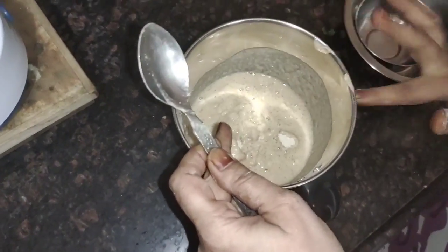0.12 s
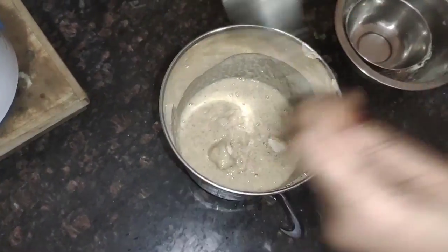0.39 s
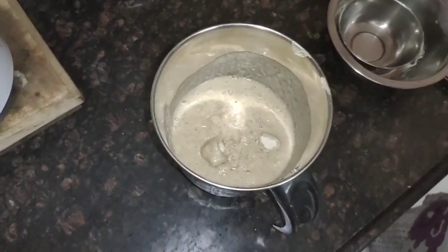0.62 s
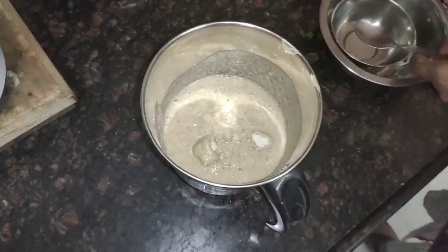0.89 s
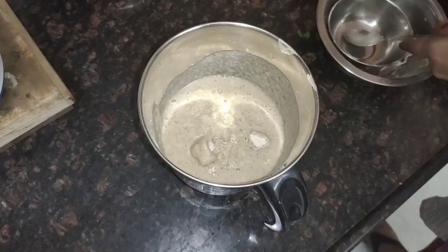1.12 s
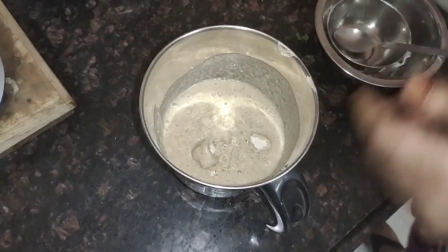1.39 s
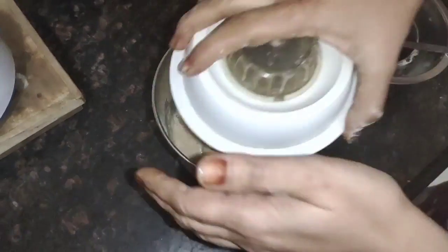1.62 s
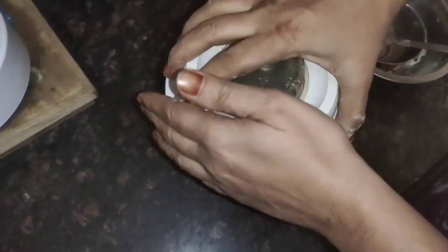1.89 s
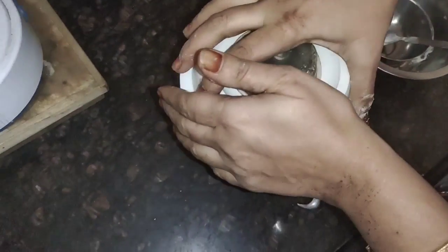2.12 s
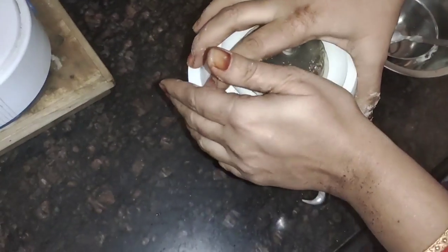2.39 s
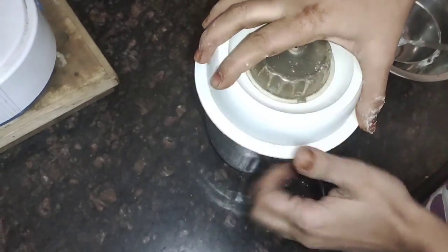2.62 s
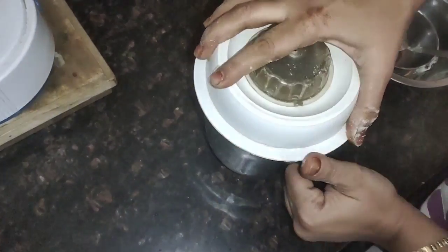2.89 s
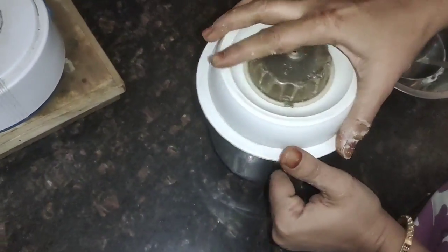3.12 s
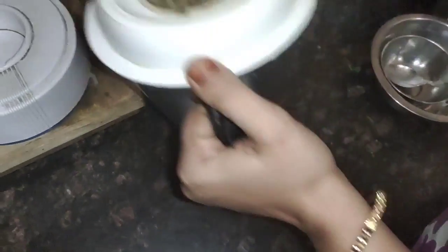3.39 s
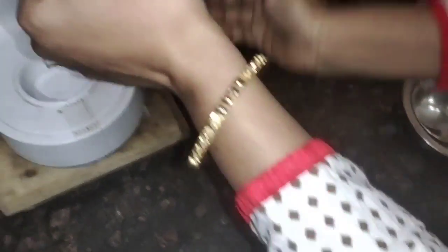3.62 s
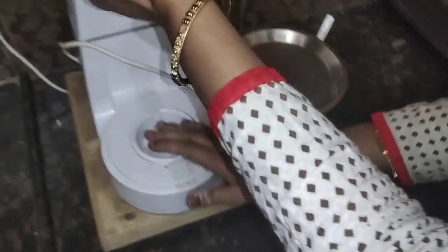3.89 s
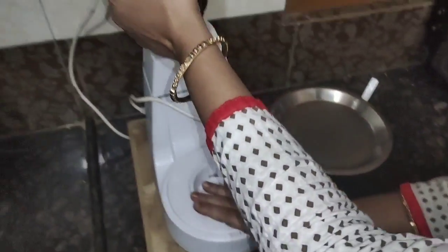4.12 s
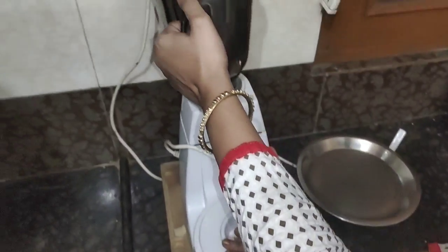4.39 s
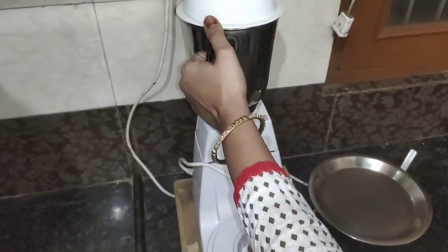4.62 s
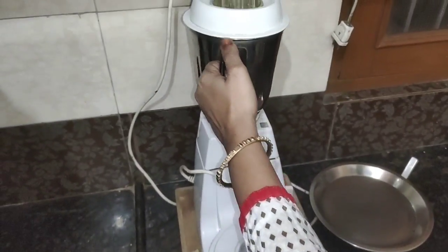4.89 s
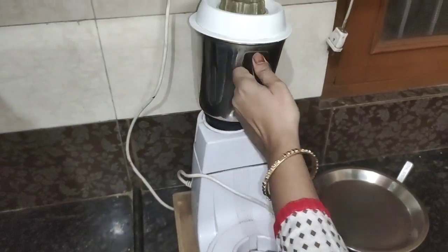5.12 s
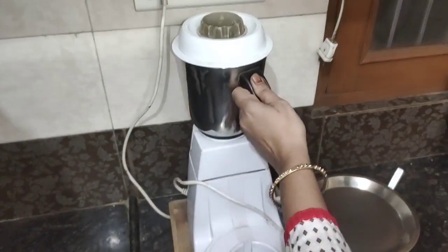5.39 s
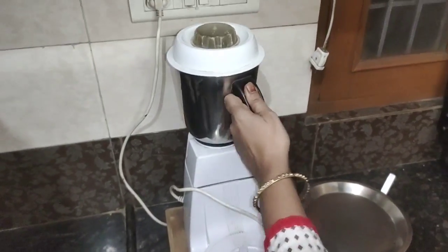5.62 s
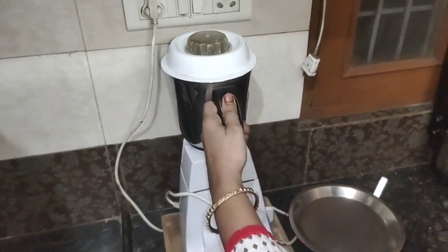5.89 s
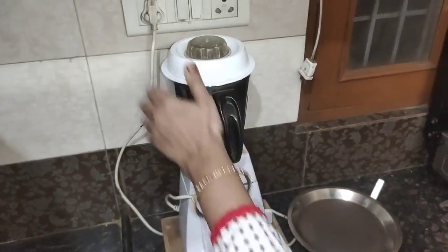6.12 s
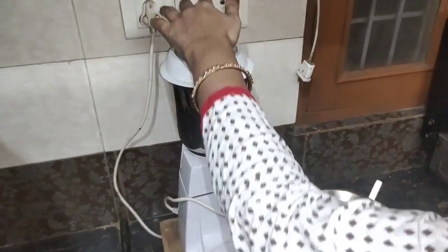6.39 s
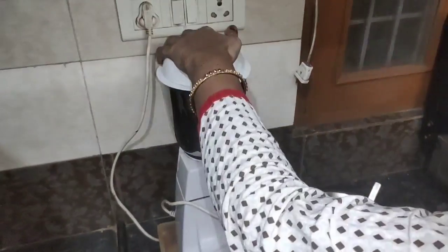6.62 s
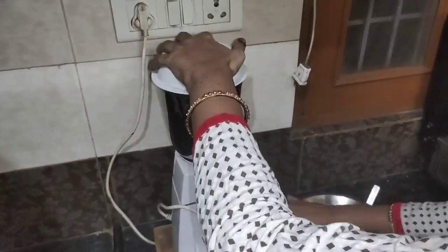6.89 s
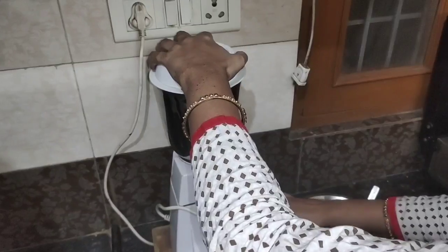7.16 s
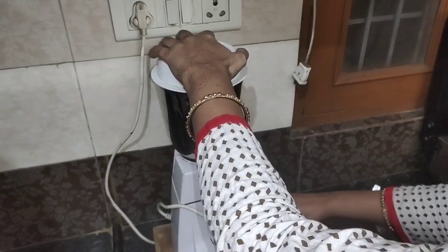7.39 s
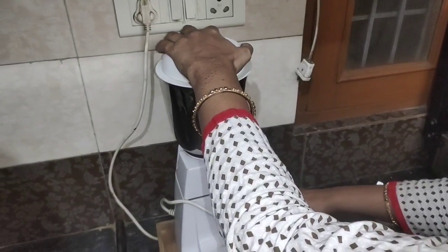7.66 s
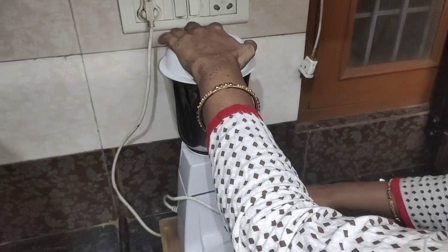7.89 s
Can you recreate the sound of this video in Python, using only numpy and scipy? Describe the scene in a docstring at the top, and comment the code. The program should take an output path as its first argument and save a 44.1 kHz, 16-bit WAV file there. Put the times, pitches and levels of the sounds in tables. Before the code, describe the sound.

Bright metal rattle, dull plastic knocks, soft handling rustle and a low mains hum as a blender jar is closed and seated, with the motor still silent.

```python
"""A steel spoon is dropped into a steel bowl and rattles, in a small tiled kitchen: both ring as sums of decaying modes.
A plastic lid is pressed on a jar, the jar is carried to a mixer base and locked, and switches click: rough
contacts excite damped modes and broadband noise. Dense noise tails echo these struck sounds.
Hands, sleeves and sliding are coloured noise, handling bumps are low noise, and mains hum is a harmonic
series. A far steady tone, a faint low drone and microphone hiss lie beneath."""
import sys
import numpy as np
from scipy import signal
from scipy.fft import rfft, irfft
from scipy.io import wavfile
from scipy.ndimage import uniform_filter1d

SR = 44100
rng = np.random.default_rng(int(sys.argv[2]) if len(sys.argv) > 2 else 0)


def gain_from_db(level_db):
    """Convert decibel levels to linear amplitude factors (20 dB per decade)."""
    decades = np.asarray(level_db, float) / 20
    return 10 ** decades


def int16_out(signal):
    """Quantize to a 16-bit WAV file."""
    q = np.round(np.clip(np.atleast_2d(signal).T, -1, 1) * 32767)
    wavfile.write(sys.argv[1], SR, q.astype(np.int16))


N = 353682  # samples


def evened(x):
    """Normalisation: scales a signal to unit rms."""
    return x / np.sqrt(np.mean(x ** 2) + 1e-20)


def read(points, hz):
    """Interpolation along logarithmic frequency."""
    f, value = np.transpose(points)
    return np.interp(np.log(hz + 1), np.log(f + 1), value)


def along(rows):
    """Linear interpolation in time: every column of a curve, sample by sample."""
    s, *columns = np.transpose(rows)
    return [np.interp(np.arange(N) / SR, s, column) for column in columns]


def add(mix, s, sound):
    """Superposition: adds a sound to the mix at time s, in place."""
    part = mix[round(s * SR):][:len(sound)]
    part += sound[:len(part)]


def coloured(points, size, grain_db=0):
    """Spectral shaping of white noise, whose level may flicker every few milliseconds; unit rms."""
    flicker = gain_from_db(grain_db * evened(uniform_filter1d(rng.standard_normal(size), size=300)))
    white = rng.standard_normal(size) * flicker
    shape = gain_from_db(read(points, np.fft.rfftfreq(size, 1 / SR)))
    return evened(irfft(rfft(white) * shape, size))


def swells(start, length, rise_db_per_s, fall_db_per_s, swell_db=0):
    """Exponential rise, hold and fall of each event, in dB under its peak, one value per millisecond."""
    t = np.arange(0, N / SR + .01, .001) - start[:, None]
    length = np.maximum(length, .002)[:, None]
    held = swell_db * (np.clip(t / length, 0, 1) - 1)
    return held + rise_db_per_s * np.minimum(t, 0) - fall_db_per_s * np.maximum(t - length, 0)


def summed(event_db):
    """Energy addition: powers of overlapping events add; returns the gain sample by sample."""
    gain = np.sqrt((gain_from_db(np.maximum(event_db, -200)) ** 2).sum(0))
    return np.interp(np.arange(N) / SR, np.arange(len(gain)) / 1000, gain)


def ring(modes, length_s, rise_s, rough, scatter_db, weight_db=0):
    """Modal superposition: each blow favours other modes, and loose contact makes them flutter."""
    hz, db, t60 = np.transpose(modes)[:, :, None]
    t = np.arange(round(length_s * SR)) / SR
    chance = rng.standard_normal((2, len(hz), 1))
    # a new flutter value every 9 ms, joined by straight lines
    steps = rng.standard_normal((2, len(hz), len(t) // 400 + 2))
    at, part = np.divmod(np.arange(len(t)), 400)
    part = part / 400
    in_phase, quadrature = steps[:, :, at] * (1 - part) + steps[:, :, at + 1] * part
    turn = 2 * np.pi * hz * t + .5 * chance[1]
    tones = (1 + rough * in_phase) * np.sin(turn) + rough * quadrature * np.cos(turn)
    level = gain_from_db(db + weight_db + scatter_db * chance[0] - 60 * t / np.maximum(t60, .02))
    start = 1 - np.exp(-t / rise_s)
    return start * (level * tones).sum(0) / np.linalg.norm(gain_from_db(db + weight_db))


# mains fundamental, picked up while a hand is near metal or the cable: t/s, rms level/dB
MAINS = [(0.4, -88), (0.54, -44.5), (0.67, -51), (0.742, -40.5), (1.442, -39.5), (1.664, -46),
         (1.776, -76.5), (3.52, -71), (3.9, -40.5), (4.38, -33), (4.76, -38), (4.84, -37.5), (4.93, -49),
         (5.02, -34.5), (5.38, -33.5), (5.65, -22.5), (5.71, -26), (5.85, -42), (6.235, -41), (6.25, -49.5),
         (6.41, -54), (6.77, -48), (8.02, -44)]
# odd overtones of the mains: t/s, rms level of the 3rd/dB, 5th/dB, 7th/dB
OVERTONES = [(0, -85, -94, -88), (3.5, -90.5, -88.5, -91.5), (3.8, -57, -75.5, -85), (4.6, -53, -77, -67),
             (5.0, -62.5, -66, -67), (5.7, -68, -58, -69), (6.2, -105, -71.5, -72), (6.4, -87, -77, -78.5),
             (8.02, -82, -73, -71)]
# 11th and 13th overtones: level relative to the 7th/dB
UPPER_DB = [-9, -12.5]


def hum():
    """Harmonic series: a mains tone with odd overtones, plus the tone of a steady appliance in the house."""
    mains_hz, far_hz, far_db = 49.9, 200.6, -76.5
    turn = 2 * np.pi * np.arange(N) / SR
    levels = along(MAINS) + along(OVERTONES)
    mains = sum(gain_from_db(db) * np.sin((2 * k + 1) * mains_hz * turn) for k, db in enumerate(levels))
    upper = sum(gain_from_db(levels[-1] + db) * np.sin(k * mains_hz * turn) for k, db in zip((11, 13), UPPER_DB))
    far = gain_from_db(far_db) * np.sin(far_hz * turn)
    return np.sqrt(2) * (mains + upper + far)  # sine peak from rms


# steady handling rumble: t/s, level/dB
STEADY_RUMBLE = [(0.0, -67), (0.42, -71), (0.53, -53.5), (1.7, -52.5), (1.77, -78), (2.6, -77),
                 (2.9, -69.5), (3.48, -77), (3.82, -54.5), (4.6, -56), (4.9, -61.5), (5.9, -62), (6.9, -71),
                 (8.02, -70)]
# jolts of the hand that holds the microphone: t/s, length/s, peak level/dB
JOLTS = [(.2, 0.063, -57.5), (1.29, 0.011, -43.5), (1.47, 0.015, -40.5), (.52, 0.05, -61),
         (1.85, 0.025, -59), (2.01, 0.047, -39), (2.37, 0.036, -54), (2.685, 0.023, -58.5),
         (2.79, .01, -45), (2.89, 0.0091, -50), (2.979, 0.009, -54.5), (4.2, .01, -41), (4.4, 0.018, -30),
         (4.5, 0.16, -46), (4.71, 0.024, -41), (5.45, 0.031, -34), (5.67, 0.022, -41), (7.01, .05, -66.5)]


def rumble():
    """Low-frequency handling noise: one lumpy noise under the combined power of steady level and jolts."""
    spectrum = [(15, -28.5), (25, -2), (50, 2.5), (100, -0.5), (150, -5), (220, -25.5), (400, -72.0)]  # f/Hz, dB
    lumps = coloured(spectrum, N, grain_db=-1.5)
    start, length, db = np.transpose(JOLTS)
    jolts = summed(db[:, None] + swells(start, length, rise_db_per_s=401, fall_db_per_s=218.5))
    return np.hypot(gain_from_db(along(STEADY_RUMBLE)[0]), jolts) * lumps


# gestures of hands and sleeves: t/s, length/s, peak level/dB of fabric hiss, of rubbing, of sliding on stone
GESTURES = [(0.111, 0.18, -63.5, -63.5, -69.5), (.5, 0.034, -58.5, -58, -53),
            (.865, 0.024, -61, -58.5, -48), (0.974, 0.22, -57.5, -55.5, -46.5),
            (1.88, 0.37, -65, -68.5, -59), (2.334, 0.06, -52, -55.5, -43.5), (2.665, 0.05, -55, -59, -67.5),
            (2.884, 0.021, -60.5, -61, -63.5), (3.071, 0.047, -58, -59.5, -51.5),
            (3.241, 0.032, -63.5, -67, -64), (5.5, 0.13, -66.5, -53.5, -44),
            (5.871, 0.016, -55, -54.5, -52.5), (6.378, 0.24, -67.5, -76, -82),
            (6.971, 0.014, -63, -61.5, -78.5), (7.131, 0.017, -67, -69, -65),
            (7.509, 0.027, -63.5, -86, -67)]
# faint rustle between the gestures: t/s, level/dB of hiss, of rubbing, of sliding
STEADY_RUSTLE = [(0, -94, -86.5, -77.5), (3.55, -96.5, -90.5, -83), (3.91, -83, -78.5, -72.5),
                 (4.4, -76, -78, -71), (5.0, -77.5, -76.5, -64.5), (5.4, -80.5, -77, -69),
                 (6.2, -78, -81.5, -77.5), (8.02, -85, -82.5, -77)]
# spectrum of fabric hiss: f/Hz, relative level/dB
HISS_SPECTRUM = [(2470, -40), (4200, -15.5), (4830, -10), (5250, -2.5), (5780, 0.5), (7230, -9.5),
                 (8500, -14.5), (14900, -25), (16000, -35)]
# spectrum of rubbing skin: f/Hz, relative level/dB
RUB_SPECTRUM = [(760, -29.5), (1300, -19.5), (1570, -3.5), (2350, -0.5), (3030, -3.5), (4800, -12.5),
                (6240, -39.5), (10600, -120)]
# spectrum of the sliding jar: f/Hz, relative level/dB
SLIDE_SPECTRUM = [(100, -51), (170, -19.5), (419, -8), (476, -8), (1250, -17), (1500, -26), (1950, -57.5),
                  (3300, -120)]
# decay rate after a gesture, for hiss, rubbing and sliding in turn: rate/(dB/s)
FADE_DB_PER_S = [129, 133.5, 164.5]


def moves():
    """Friction noise: cloth hisses, skin rubs and the jar slides, each a band of noise with its own envelope."""
    hiss = coloured(HISS_SPECTRUM, N, grain_db=1.5)
    rub = coloured(RUB_SPECTRUM, N, grain_db=1.0)
    slide = coloured(SLIDE_SPECTRUM, N, grain_db=2.0)
    start, length, *peaks = np.transpose(GESTURES)
    out = np.zeros(N)
    for noise, peak_db, fade, steady_db in zip((hiss, rub, slide), peaks, FADE_DB_PER_S, along(STEADY_RUSTLE)):
        # a gesture sets in fast, then grows a little while it lasts
        envelope_db = swells(start, length, rise_db_per_s=594, fall_db_per_s=fade, swell_db=5.5)
        gain = summed(peak_db[:, None] + envelope_db)
        out += np.hypot(gain, gain_from_db(steady_db)) * noise
    return out


# modes of jar, lid and plastic base together: f/Hz, relative level/dB, t60/s
JAR_MODES = [(250, -4, .09), (292, 0, .1), (332, -4, .09), (395, -9, .08), (556, -4, .12), (625, -3, .12),
             (663, 0, .11), (775, -8, .1), (955, -5, .16), (1050, -18, .7), (1155, -6, .15),
             (1270, -8, .12), (1480, -10, .1), (2050, -8, .06), (2500, -10, .05), (2770, -9, .03)]
# knocks and clicks on them: t/s, strength/dB, favoured f/Hz, spread/octaves (at least 0.25 is used),
# contact decay time/ms, treble level relative to strength/dB
KNOCK_EVENTS = [(0.512, -33.5, 790, 0.76, 53, -24), (1.817, -13.5, 745, 0.58, 19.5, -15),
                (1.846, -9.5, 687, 0.71, 25, -24), (1.994, -21.5, 300, 0.88, 12, -21.5),
                (2.333, -23.5, 871, 0.88, 36, -37), (2.69, -47.5, 2343, 0.17, 39, -17),
                (3.072, -43.5, 700, 1.07, 72, -20), (3.269, -44, 374, 0.39, 7.2, -8.5),
                (4.381, -15, 621, 0.77, 8.4, -14), (4.532, -19, 671.5, 1.05, 5.8, -21.5),
                (4.701, -25.5, 330, 0.77, 11.7, -23.5), (4.807, -13, 294, 0.7, 7.2, -18),
                (4.86, -30, 302, 0.83, 7.97, -21), (5.415, -26.5, 596, 0.82, 24, -11),
                (5.427, -6.5, 420, 0.85, 13, -10), (5.488, -16, 893, 0.5, 14, -11.5),
                (5.911, -37.5, 650, 0.91, 9.4, -9.5), (6.006, -40.5, 397.3, 0.22, 2.6, -30),
                (7.136, -49.5, 268.8, 0.23, 6.7, -12), (7.206, -42.5, 473, 0.76, 5.8, -2),
                (7.518, -42, 2776, 0.41, 10, -12.5), (7.525, -53, 730, 0.26, 7, -30)]


def knocks():
    """Impact excitation: a short rough contact drives the modes near a favoured pitch, under a treble scuff."""
    out, t = np.zeros(N), np.arange(SR // 4) / SR
    scuff_spectrum = [(400, -2.5), (1200, 4), (3000, -6.0), (4500, -15.5), (6000, -14), (9000, -21.5),
                      (16000, -34)]  # f/Hz, relative level/dB
    for s, db, hz, octaves, contact_ms, treble_db in KNOCK_EVENTS:
        octaves = max(octaves, .25)
        decay = np.exp(-1000 * t / max(contact_ms, .5))
        touch = (1 - np.exp(-t / .0005)) ** 2 * decay

        def near_db(f):
            """Gaussian weighting over log frequency: 6 dB down at one spread from the favoured pitch."""
            return -6 * (np.log2(f / hz) / octaves) ** 2

        mode_weights = near_db(np.array(JAR_MODES)[:, :1])
        body = ring(JAR_MODES, .35, .003, rough=.65, scatter_db=2., weight_db=mode_weights)
        thud_spectrum = [(f, near_db(f)) for f in np.geomspace(60, 16000, num=16)]
        thud = coloured(thud_spectrum, len(t)) * touch
        scuff = coloured(scuff_spectrum, len(t)) * (touch + 0.1 * touch ** 0.14)  # a faint slow tail
        add(out, s, gain_from_db(db + 6.5 - 10.63 * octaves) * body)  # a flat blow deadens the ring
        add(out, s, gain_from_db(db - 7) * thud + gain_from_db(db + treble_db) * scuff)
    # plastic is soft: little top
    return signal.sosfilt(signal.butter(2, 7000., fs=SR, output="sos"), out)


# modes of the steel spoon: f/Hz, relative level/dB, t60/s
SPOON_MODES = [(1658, 0, .4), (1590, -8, .4), (2525, -10, .35), (2680, -8, .5), (2848, -5, .3),
               (4630, -10, .25), (4904, -12, .3), (5114, -7, .15), (5512, -12, .25), (5792, -11, .25),
               (6691, -16, .4), (7838, -17, .3), (9039, -19, .2), (9814, -17, .2), (10930, -25, .2)]
# modes of the steel bowl: f/Hz, relative level/dB, t60/s
BOWL_MODES = [(641, -7, .45), (510, -14, .35), (860, -10, .4), (950, -8, .4), (1020, -11, .4),
              (1589, -6, .5), (1615, -5, .5), (1683, 0, .6), (1810, -11, .45), (1960, -13, .45),
              (2680, 2, .6), (2778, -8, .6), (3133, -18, .5), (3290, -27, 1.6), (4290, -14, .55),
              (4897, -12, .45), (5815, -10, .5), (7375, -16, .5), (7445, -13, .5), (7854, -15, .55),
              (9685, -19, .4), (9808, -18, .4), (11130, -22, .5), (11780, -25, .45)]
# touches of steel on steel: t/s, spoon ring level/dB, bowl ring level/dB, crack level/dB
TOUCHES = [(1.261, -20, -36, -13.5), (1.292, -23, -33, -18.5), (1.426, -28.5, -33.5, -30),
           (1.434, -29.5, -15, -16), (1.448, -27.5, -14, -14.5), (1.476, -32, -23, -21.5),
           (1.515, -29.5, -18.5, -18), (1.545, -34, -23.5, -23.5), (1.574, -37.5, -28, -23),
           (1.674, -45.5, -36, -26.5)]
# crack spectrum of the spoon: f/Hz, relative level/dB
SPOON_CRACK = [(530, -74.5), (900, -42), (1660, -9.5), (2330, -14.5), (2890, -9.5), (3590, -28),
               (5220, -6.5), (13800, -35), (15700, -66.5)]
# crack spectrum of the bowl: f/Hz, relative level/dB
BOWL_CRACK = [(210, -46.5), (350, -16.5), (1360, -12.5), (1630, -4), (2240, -15), (2750, -12.5),
              (4040, -13.5), (7670, -11.5), (12800, -22), (15000, -30.5), (15700, -59.5)]


def clinks():
    """Modal radiation: spoon and bowl ring at each touch, over a noise crack for their dense high modes."""
    out, t = np.zeros(N), np.arange(SR // 2) / SR
    # random peaks over frequency make the dense modes stand out of the shimmer
    peaks = gain_from_db(6 * evened(uniform_filter1d(rng.standard_normal(len(t) // 2 + 1), size=12)))
    for s, spoon_db, bowl_db, crack_db in TOUCHES:
        add(out, s, gain_from_db(spoon_db) * ring(SPOON_MODES, .4, .0006, rough=.7, scatter_db=2.))
        add(out, s, gain_from_db(bowl_db) * ring(BOWL_MODES, .7, .0006, rough=.45, scatter_db=2.))
        spoon_share = 1 / (1 + gain_from_db(2 * (bowl_db - spoon_db)))  # of the ringing power
        dense = spoon_share * coloured(SPOON_CRACK, len(t)) + (1 - spoon_share) * coloured(BOWL_CRACK, len(t))
        peaky = evened(irfft(rfft(dense) * peaks, len(t)))
        contact = gain_from_db(-60 * t / 0.026) * dense
        shimmer_t60 = 0.52 - 0.18 * spoon_share  # s; the spoon dies sooner
        shimmer = gain_from_db(-7.5 - 60 * t / shimmer_t60) * peaky
        onset = 1 - np.exp(-t / .0008)
        add(out, s, gain_from_db(crack_db) * onset * (contact + shimmer))
    return out


# reverberation of the kitchen: f/Hz, t60/s
KITCHEN_DECAY = [(100, 0.5), (300, 0.55), (600, 0.36), (1200, 0.5), (3000, 0.32), (8000, 0.12),
                 (16000, 0.17)]


def kitchen(x):
    """Statistical reverberation off tiles and stone: three noise tails, each band with its own decay, take turns."""
    hz, t, z = signal.stft(rng.standard_normal((3, SR // 2)), SR, nperseg=256)
    decay = gain_from_db(-60 * t / read(KITCHEN_DECAY, hz)[:, None])
    tails = signal.istft(z * decay, SR, nperseg=256)[1]
    # the first echoes come 130 samples (3 ms) late
    tails = np.pad(tails, ((0, 0), (130, 0))) / np.linalg.norm(tails, axis=1, keepdims=True)
    # the tails change over as things move
    phase = np.pi * (2.3 * np.arange(N) / SR + np.arange(3)[:, None] / 3)
    turns = np.sqrt(2 / 3) * np.cos(phase)
    return signal.fftconvolve(x * turns, tails, axes=1)[:, :N].sum(0)


# drone that comes up near the wall: t/s, level/dB
DRONE_LEVEL = [(3.599, -95.5), (4.2, -83), (6.3, -86.5), (6.7, -91), (7.3, -74.5), (8.02, -77)]


def drone():
    """Narrow-band noise: two faint fuzzy bands with a strongly flickering level."""
    bands = [(450, -40.0), (600, -3), (750, -12.5), (950, -18), (1080, 2.0), (1250, -38)]  # f/Hz, relative level/dB
    return gain_from_db(along(DRONE_LEVEL)[0]) * coloured(bands, N, grain_db=5.0)


def scene():
    """Superposition of direct struck sound, its reverberation and everything close to the microphone."""
    steel, plastic = clinks(), knocks()
    struck = steel + plastic + kitchen(gain_from_db(-10.5) * steel + gain_from_db(-6.5) * plastic)
    return (struck + moves() + rumble() + drone() + hum())[None]


def suppressed(x):
    """Downward expansion: lowers each band that falls well under its recent peak, so tails end early."""
    hz, t, z = signal.stft(x, SR, nperseg=512, noverlap=384)
    power = uniform_filter1d(abs(z) ** 2, size=9, axis=1)  # over frequency
    power = uniform_filter1d(power, size=13, axis=2)  # over time
    level_db = 10 * np.log10(abs(power) + 1e-14)
    forget_db = 58.0 * t  # the remembered peak sinks at 58 dB/s
    peak_db = np.maximum.accumulate(level_db + forget_db, axis=2) - forget_db
    under_db = peak_db - level_db
    cut_db = np.clip(under_db - 13.0, 0, 14) * (hz > 170)[:, None]
    return signal.istft(z * gain_from_db(-cut_db), SR, nperseg=512, noverlap=384)[1][:, :N]


def band_limit(x):
    """A steep low-pass at the top of the band."""
    return signal.sosfilt(signal.butter(12, 16510, fs=SR, output="sos"), x)


def record(dry):
    """Transduction: white microphone self-noise is added, then the tails are suppressed."""
    self_noise = gain_from_db(-80) * rng.standard_normal(dry.shape)
    heard = suppressed(dry + self_noise)
    return band_limit(heard)


dry = scene()
out = record(dry)
int16_out(out)
```